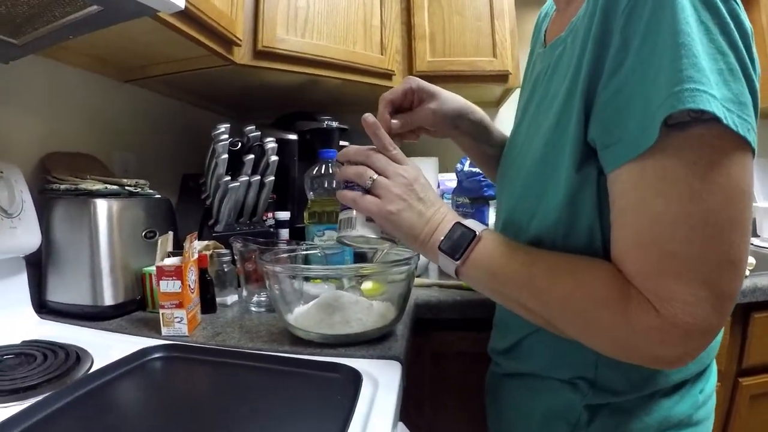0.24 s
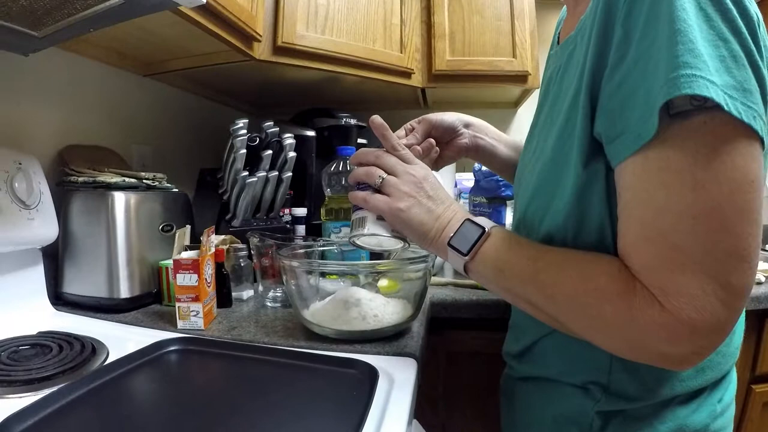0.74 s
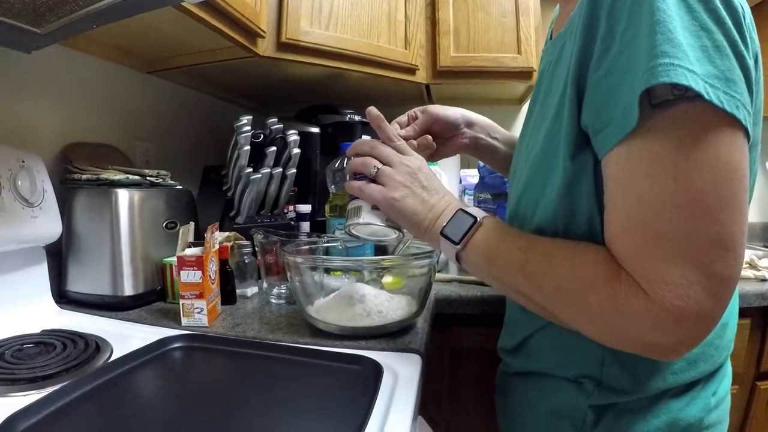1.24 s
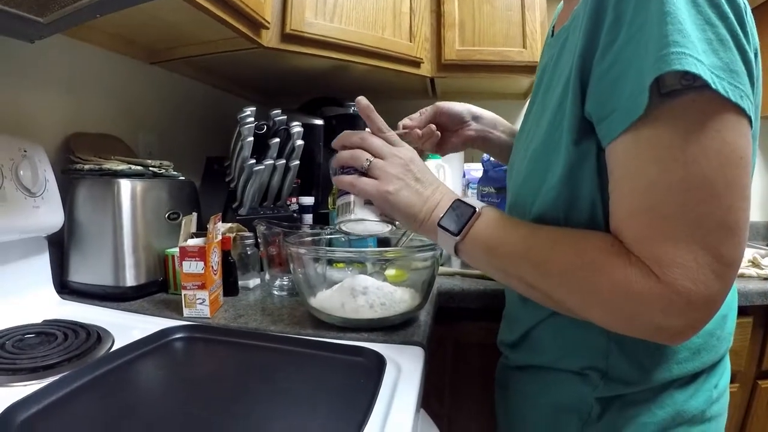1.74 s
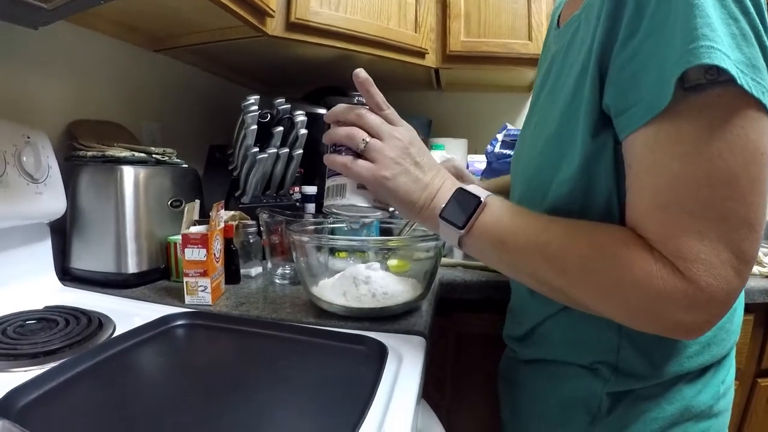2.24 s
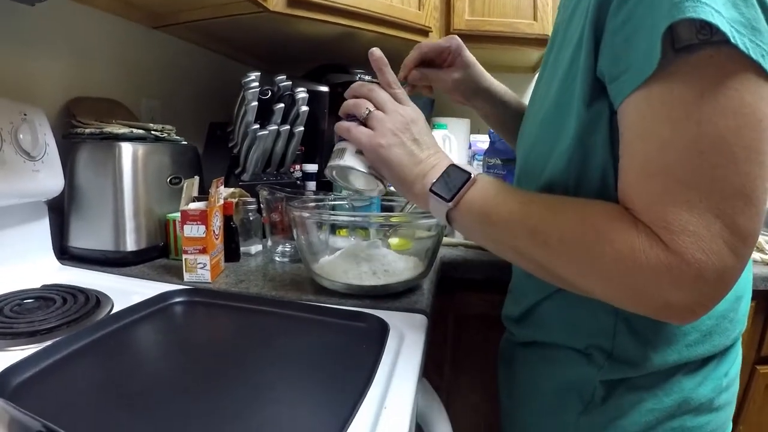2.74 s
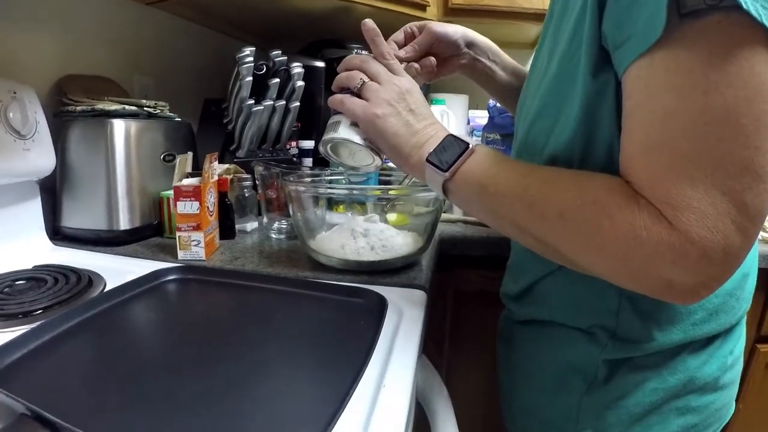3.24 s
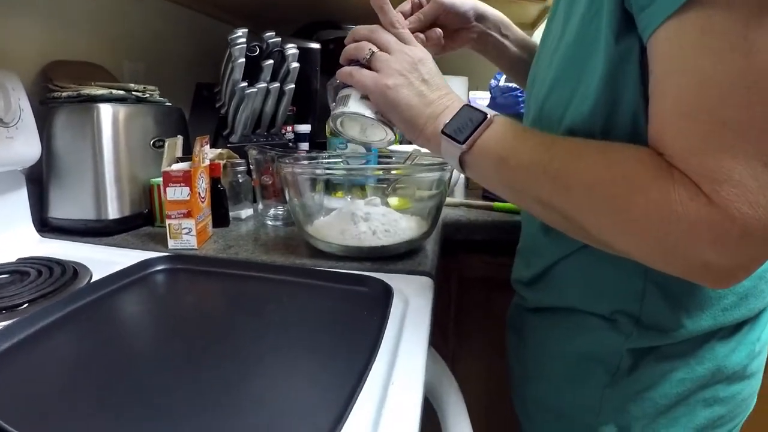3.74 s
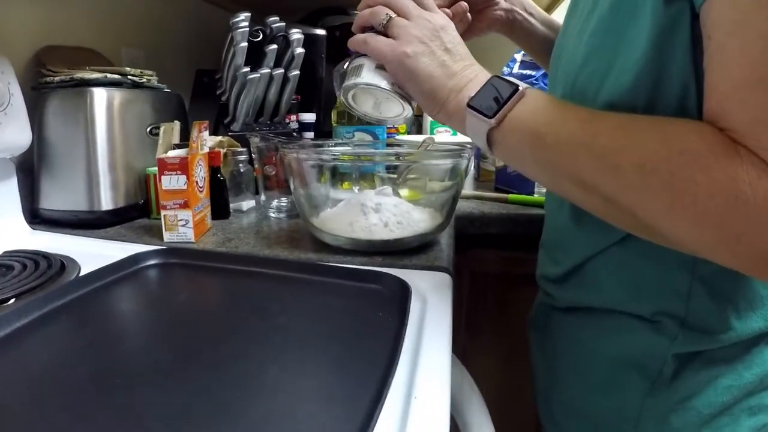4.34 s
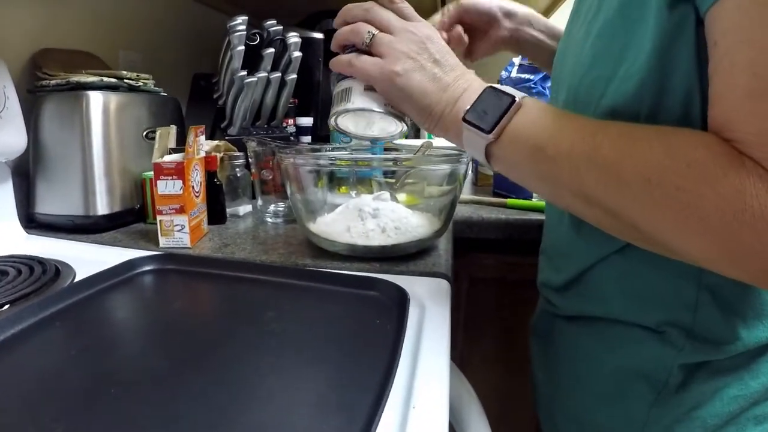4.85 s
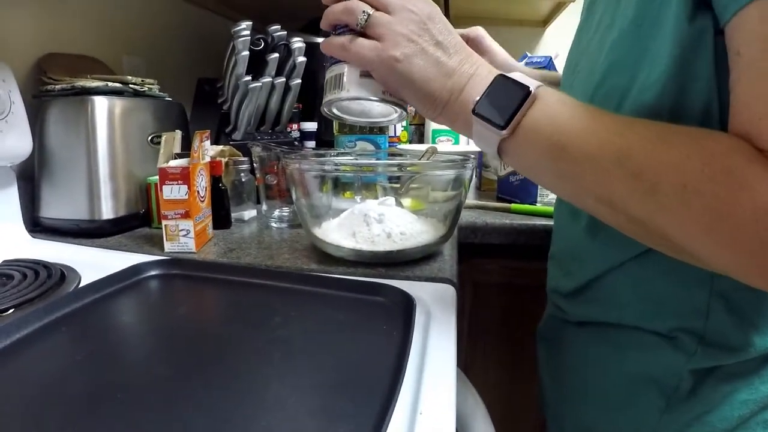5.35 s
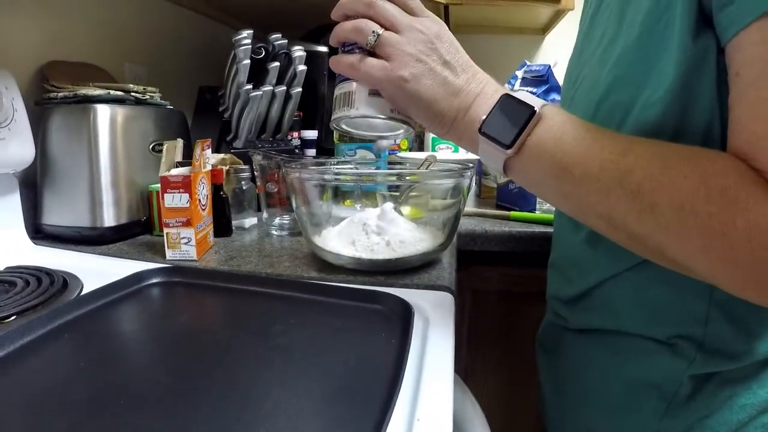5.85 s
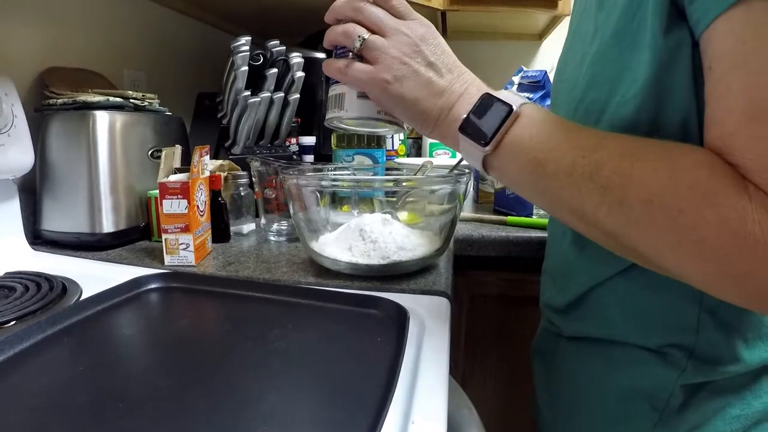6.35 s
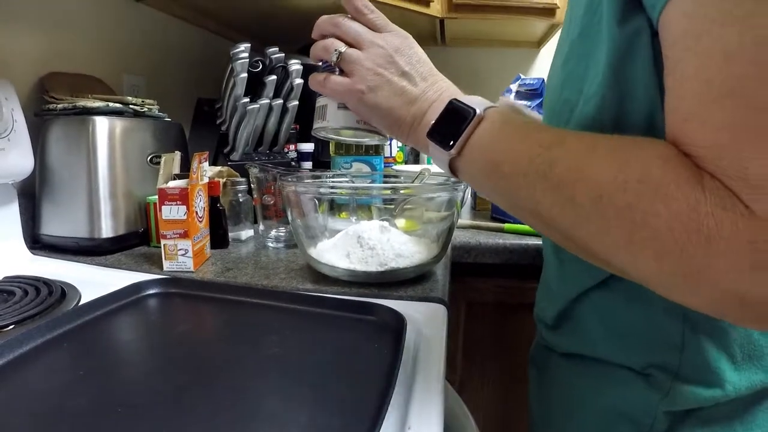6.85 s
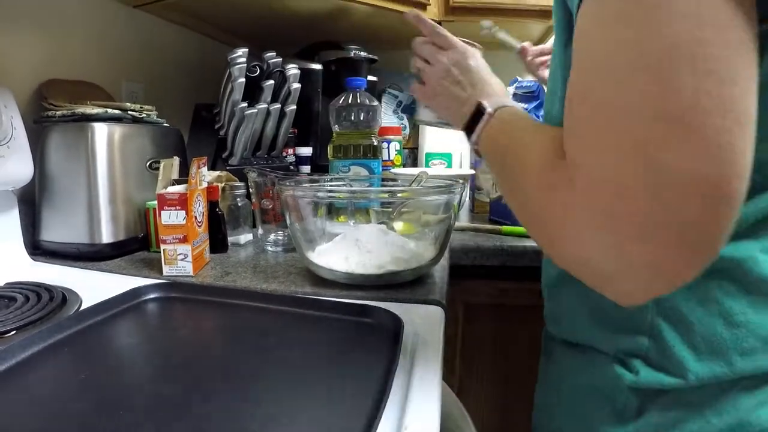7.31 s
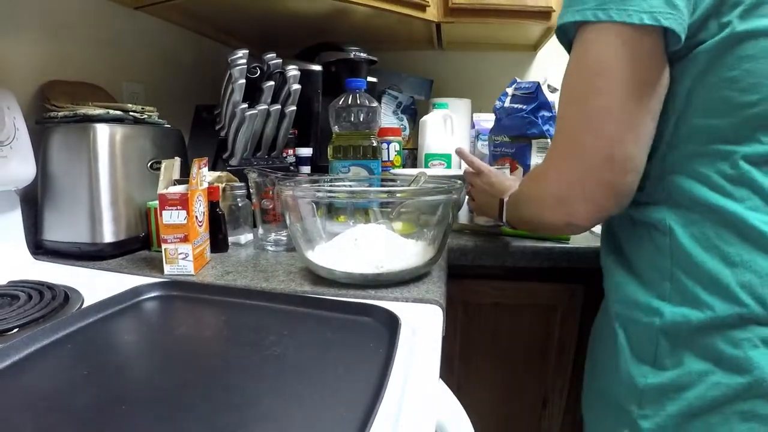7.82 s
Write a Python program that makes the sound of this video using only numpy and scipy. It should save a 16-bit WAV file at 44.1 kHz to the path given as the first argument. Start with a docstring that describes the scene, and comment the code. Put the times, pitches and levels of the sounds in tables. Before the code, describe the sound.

Close stereo pickup from a moving camera, with low rubbing and thuds leaning left. Under everything runs a motor hum with airy hiss and a faint whine that comes up midway. Sparse spoon clicks on a can come first, then two ringing strikes on a glass mixing bowl, and finally a quick woody rattle and short slide on the worktop, with short room reflections.

```python
"""Kitchen counter, heard in stereo from a moving camera. From the start an appliance hums, whines and blows air
(tones and coloured noise) while the camera body rumbles, rubs and bumps, mostly on the left (noise, short modes).
A steel spoon clicks and once scrapes on a small can's rim (noise bursts, damped modes), from 0.09 to 5 s.
At 6.6 and 7 s it taps a glass mixing bowl, which rings (decaying mode pairs), the second time with a low thump;
at 7.9 s a hard object knocks and slides on the worktop. The room answers; gain control and a limiter follow."""
import sys
import numpy as np
from scipy import signal
from scipy.fft import rfft, irfft, next_fast_len
from scipy.io import wavfile
from scipy.ndimage import uniform_filter1d, minimum_filter1d, map_coordinates

SR = 44100
rng = np.random.default_rng(int(sys.argv[2]) if len(sys.argv) > 2 else 0)


def store_wav(level_fs):
    """Save 16-bit WAV to argv[1]."""
    pcm = np.round(np.clip(np.atleast_2d(level_fs), -1, 1) * 32767)
    wavfile.write(sys.argv[1], SR, pcm.T.astype(np.int16))


N = 356239  # samples in the scene
SHORT, LONG = SR // 4, SR  # samples given to a short sound and to a bowl tap


def amp(db):
    """Decibels to gain."""
    return 10 ** (np.asarray(db) / 20)


def unit(x):
    """x at rms 1."""
    return x / np.sqrt(np.mean(x ** 2) + 1e-20)


def along(points, hz):
    """(Hz, value) points read on a log frequency axis."""
    f, v = np.transpose(points)
    return np.interp(np.log(hz + 1), np.log(f + 1), v)


def curves(rows):
    """One value per sample for each column after the time."""
    s, *cols = np.transpose(rows)
    return [np.interp(np.arange(N) / SR, s, c) for c in cols]


def wobble(rate):
    """A smooth random curve, rate knots a second."""
    frames = np.linspace(0, N * rate / SR, N // 100)
    knots = rng.standard_normal(int(frames[-1]) + 4)
    path = map_coordinates(knots, [frames])
    return np.interp(np.arange(N) * rate / SR, frames, path)


def filtered(x, response):
    """x times a response of frequency."""
    n = x.shape[-1]
    m = next_fast_len(n + SR // 4)
    hz = np.fft.rfftfreq(m, 1 / SR)
    return irfft(rfft(x, m) * response(hz), m)[..., :n]


def pan(left_db):
    """Gains of the two channels for a left-right level difference."""
    return amp(np.array([[left_db], [-left_db]]) / 2)


def noise(spectrum, alike, envelope):
    """Stereo noise with partly alike channels, shaped in time, then coloured by a causal filter."""
    def mid_and_side(hz):
        turn = np.arccos(np.clip(along(alike, hz), -1, 1)) / 2
        return np.array([np.cos(turn), np.sin(turn)])

    mid, side = filtered(rng.standard_normal((2, len(envelope))), mid_and_side)
    white = unit(np.array([mid + side, mid - side])) * envelope
    # the folded cepstrum gives the minimum-phase filter, so no sound precedes its cause
    size = 16384
    cepstrum = irfft(np.log(amp(along(spectrum, np.fft.rfftfreq(size, 1 / SR)))))
    folded = 2 * cepstrum[:size // 2] * (np.arange(size // 2) > 0)
    kernel = irfft(np.exp(rfft(folded, size)))
    kernel = kernel / np.linalg.norm(kernel)
    return signal.fftconvolve(white, kernel[None], axes=1)[:, :len(envelope)]


def fade(t60, size=SHORT):
    """Exponential decay, 60 dB in t60 seconds."""
    return np.exp(-np.log(1000) * np.arange(size) / SR / t60)


def ring(hz, t60, phase=0, size=SHORT):
    """A struck mode: a decaying sine."""
    return np.sin(2 * np.pi * hz * np.arange(size) / SR + phase) * fade(t60, size)


def add(track, s, sound):
    """Mix a sound into the track at s seconds."""
    part = track[:, round(s * SR):][:, :sound.shape[-1]]
    part += sound[..., :part.shape[1]]


def tone(hz, drift_hz):
    """A steady tone of rms 1 whose pitch drifts at random."""
    return np.sqrt(2) * np.sin(2 * np.pi * np.cumsum(hz + drift_hz * wobble(14)) / SR)


# Air level of the appliance. Each row: time in seconds, relative level in dB.
AIR_LEVEL = [(0.0, -54), (0.76, -56.5), (1.37, -53.5), (1.7, -56.5), (3.25, -55.5), (4.26, -60.5),
             (4.75, -59.5), (5.34, -61.5), (5.76, -57.5), (7.64, -56), (8.05, -56.5)]
# The whine comes up. Each row: time in seconds, relative level in dB.
WHINE_LEVEL = [(3.2, -68), (3.7, -62.5), (8, -59)]
# Motor hum tones. Each row: centre frequency in Hz, relative level in dB.
HUM_TONES = [(127.5, -44.5), (178, -58.5), (228, -57), (298, -58.5), (523, -60.5), (667, -64), (872, -66.5),
             (985, -65)]
# Colour of the air rush. Each row: frequency in Hz, relative level in dB per Hz.
RUSH_COLOUR = [(60, 4), (130, 6.5), (250, 4), (400, 0.5), (540, 1.5), (700, -0.5), (1000, -2.5), (1450, -5),
               (1700, -9), (2400, -11), (3300, -25.5), (6000, -46), (12000, -98)]
# Colour of the fine hiss. Each row: frequency in Hz, relative level in dB per Hz.
HISS_COLOUR = [(1500, -9.5), (3000, -0.5), (4500, -4), (5800, -0.5), (7300, -1.5), (8000, -10),
               (10000, -11.5), (12200, -20), (13000, -27), (14500, -70.5)]
# Stereo likeness of the air noise. Each row: frequency in Hz, left-right correlation from -1 to 1.
AIR_LIKENESS = [(100, 1), (470, 0.65), (950, -0.28), (3000, 0.2), (7000, -0.15)]


def appliance():
    """Motor hum, a thin wavering whine and a rush of air under fine hiss; rush and hiss follow one level."""
    hiss_db, rush_db, rush_waver_db = 4, 16, 0.78  # over the air level
    air_db, = curves(AIR_LEVEL)
    whine_db, = curves(WHINE_LEVEL)
    hum = sum(amp(db + 3.36 * wobble(3.7)) * tone(hz, drift_hz=2.983) for hz, db in HUM_TONES)
    whine = amp(whine_db + 1.5 * wobble(6.0)) * tone(1394, drift_hz=2.54)
    rush = noise(RUSH_COLOUR, AIR_LIKENESS, amp(air_db + rush_db + rush_waver_db * wobble(2.24)))
    hiss = noise(HISS_COLOUR, AIR_LIKENESS, amp(air_db + hiss_db))
    return hum * pan(-7.0) + whine * pan(-19.5) + rush * pan(-3.0) + hiss * pan(-2.2)


def around(s, width_s):
    """A smooth hump of height 1 centred on s seconds."""
    return np.exp(-((np.arange(N) / SR - s) / width_s) ** 2)


# Colour of the low rumble in the camera body. Each row: frequency in Hz, relative level in dB per Hz.
RUMBLE_COLOUR = [(4, -4.5), (15, 7.5), (40, 2.5), (52, -5.5), (70, -8.5), (100, -29.5), (200, -67),
                 (600, -120)]
# Colour of rubbing on the camera body. Each row: frequency in Hz, relative level in dB per Hz.
RUB_COLOUR = [(40, -12), (75, 6), (100, -3), (150, -12), (230, -18), (320, -27), (420, -36), (900, -67.5),
              (3000, -120)]
# Soft low bumps on the camera body; the one at 6.964 s is the low thump of the second bowl tap.
# Each row: start in seconds, relative level in dB, main pitch in Hz.
LOW_BUMPS = [(0.202, -5, 172), (1.346, -4, 174), (1.438, -8, 180), (1.8732, -6, 194), (2.319, -2.5, 186),
             (2.546, -9, 226), (2.619, -7.5, 195), (2.832, -7.5, 172), (3.07, -3.5, 188),
             (3.253, -9.5, 182), (3.586, -3.5, 203), (3.838, -7, 185), (4.0854, -1, 201),
             (4.1602, -12, 208), (4.298, -6.5, 181), (4.903, -5.5, 220), (4.968, -7, 174),
             (6.964, -3.5, 190)]


def handling():
    """The camera body rumbles, pushing its two microphone ports in opposite senses, rubs and takes soft bumps;
    the low thump of the second bowl tap is made the same way."""
    rub_level_db, rub_waver_db = -35.5, 1.5
    stir_db, stir_s = 3, 0.36  # the rubbing grows around each low bump: rise, half-width of the hump
    rest_s, rest_width_s, rest_db = 5.17, 0.22, -5  # the camera is nearly still for a moment

    deep = noise(RUMBLE_COLOUR, [(60, -0.63)], np.ones(N))
    power = uniform_filter1d(deep[0] ** 2, size=SR // 25)
    deep /= np.sqrt(.4 + .6 * power)  # an even rumble without tall peaks

    stir = np.max([around(s, stir_s) for s, db, hz in LOW_BUMPS], axis=0)
    rub_db = rub_level_db + stir_db * stir + rest_db * around(rest_s, rest_width_s)
    rub_db = rub_db + rub_waver_db * wobble(8)
    rub = noise(RUB_COLOUR, [(80, -0.73), (200, 0.68)], amp(rub_db))

    out = amp(-18.5) * deep + rub
    soft_start = (1 - fade(0.038)) ** 2
    for s, db, hz in LOW_BUMPS:
        push = ring(hz, 0.028) + amp(-0.5) * ring(hz * 0.4, 0.061) + amp(-5.5) * ring(hz * 1.675, 0.02)
        add(out, s, amp(db) * push * soft_start)
    return out * pan(14.0)


def favour(hz, centre_hz, octaves):
    """How well a contact point drives a mode, 0 to 1."""
    return np.exp(-(np.log2(hz / centre_hz) / octaves) ** 2)


# Spoon against the can. Each row: start in seconds, relative levels in dB of click, can body and spoon ring,
# Hz that the contact point favours, Hz above which the click is dull.
CAN_CLICKS = [(.089, -48, -45, -40, 3000, 7000), (.1288, -30.5, -55, -30, 3000, 7000),
              (.1355, -33, -52, -29.5, 2400, 7000), (1.6551, -45, -35, -38, 4200, 8000),
              (1.678, -42, -46, -37, 4300, 12000), (1.686, -48, -60, -38, 5200, 9000),
              (2.7795, -24, -35, -26, 4200, 11000), (2.781, -27.5, -50, -30, 6400, 11000),
              (2.787, -31, -48, -33, 7300, 13000), (2.798, -31, -55, -35, 6300, 11000),
              (2.805, -36, -58, -39, 4800, 9000), (2.846, -27, -24.5, -36, 6500, 7500),
              (2.852, -30, -35, -34, 2500, 8000), (2.9, -52, -38, -54, 6000, 7000),
              (2.92, -41, -50, -54, 6000, 8000), (2.936, -22.5, -44, -27, 4700, 13000),
              (2.943, -36, -37, -42, 5000, 12000), (4.529, -41, -50, -52, 4000, 5000),
              (4.975, -48, -60, -58, 6000, 12000)]
# Colour of the click. Each row: frequency in Hz, relative level in dB per Hz.
CLICK_SPECTRUM = [(300, -6), (1000, 3), (2300, 0.5), (3000, -0.5), (3500, -2.5), (4200, 1.5), (5100, 3.5),
                  (5600, -1.5), (6200, 1.5), (6900, 3), (8200, -7.5), (10500, -9), (12000, -22),
                  (13600, -23), (15500, -50)]
# The can's hollow ring. Each row: frequency in Hz, relative level in dB, t60 in seconds.
CAN_MODES = [(807, -11, .14), (1005, 1, .07), (1105, 1.5, .05), (1189, 2, .115), (1225, -4, .1),
             (1416, -3, .051), (1800, -8, .075), (2125, -13, .07), (2620, -14, .07)]
# The spoon's ring, damped by the hand. Each row: frequency in Hz, relative level in dB, t60 in seconds.
SPOON_MODES = [(2290, -2, .04), (2560, -12, .03), (3000, -7, .08), (4180, -2, .03), (4495, -5, .045),
               (5110, -6, .035), (5330, -5.5, .07), (5890, -4, .03), (6340, -2, .045), (6880, -2.5, .045),
               (7440, -8, .06), (10420, -3, .04)]


def can():
    """The spoon clicks on the rim and pings; the gripped can answers with a short, hollow ring."""
    out = np.zeros((2, N))
    click_shape = amp(-3.5) * fade(0.053) + amp(-15) * fade(0.0037)
    onset = 1 - fade(0.00085)
    for s, click_db, body_db, ping_db, contact_hz, dull_hz in CAN_CLICKS:
        click = noise(CLICK_SPECTRUM, [(1000, 0.52), (5000, 0.29)], click_shape)
        # softer contacts lack the top
        click = filtered(click, lambda hz: 1 / np.sqrt(1 + (hz / dull_hz) ** 8))
        body = sum(amp(level) * ring(hz, t60) for hz, level, t60 in CAN_MODES)
        ping = 0
        for hz, level, t60 in SPOON_MODES:
            missed_db = 46 * (1 - favour(hz, contact_hz, octaves=0.78))  # far modes are barely driven
            ping = ping + amp(level - missed_db) * ring(hz, t60, rng.uniform(0, np.pi, (2, 1)))
        rings = (amp(body_db - 5) * body + amp(ping_db) * ping) * onset
        add(out, s, amp(click_db) * click * pan(1.9) + rings)
    return out


# Colour of the squeak on the rim. Each row: frequency in Hz, relative level in dB per Hz.
SCRAPE_SPECTRUM = [(1000, -11), (3100, -26), (4400, -5), (4900, -16), (5330, -5), (5600, -6), (5890, 5),
                   (6200, -8), (7000, -9), (8200, -21.5), (12000, -34), (15000, -58)]


def scrape():
    """The spoon's edge drags over the rim, pressing harder as it goes, with a brief, gritty squeak."""
    start_s, length_s, final_db = 1.654, 0.026, -32.5
    grows_db, grain_db = 10, 0.5
    t = np.arange(SHORT) / SR
    grain = unit(uniform_filter1d(rng.standard_normal(SHORT), size=60))
    press_db = grows_db * (np.minimum(t / length_s, 1) - 1) + grain_db * grain
    release = np.interp(t - length_s, t, fade(0.015))  # holds at 1 until the drag ends
    squeak = noise(SCRAPE_SPECTRUM, [(1000, 0.54), (5000, 0.29)], amp(final_db + press_db) * release)
    out = np.zeros((2, N))
    add(out, start_s, squeak)
    return out


def shimmer(hz):
    """High modes flutter in level as they die; low ones stay smooth."""
    knots = rng.standard_normal(60)
    depth_db = np.interp(hz, [1500, 2400, 6000], [0, 2.2, 3.5])
    path = np.interp(np.linspace(0, len(knots) - 1, LONG), np.arange(len(knots)), knots)
    return amp(depth_db * path)


# Spoon on the bowl. Each row: start in seconds, relative levels in dB of glass, spoon clash and its after-ring.
BOWL_TAPS = [(6.6107, -11.5, -19, -30.5), (6.9525, -5, -10, -27)]
# The glass bowl's modes, many in beating pairs. Each row: frequency in Hz, relative level in dB, t60 in seconds,
# left-right level in dB, left phase lead in radians, level change in dB at the second tap's spot.
BOWL_MODES = [(598, -2, .29, -4.5, .1, -1.5), (610, -7.5, .27, -4.5, .1, -1),
              (1338.4, -6.8, .89, -2.5, .5, 0), (1339.6, -7.3, .89, -2.5, .5, 0),
              (2347, -12, .21, 2, 1, -8), (2350, -28, .65, 2, 1, -4), (3615, -21.5, .27, 3, .3, -2),
              (3620.5, -23, .27, 3, .3, -3), (3973, -28, .06, 2, .5, 2), (5136, -16.5, .11, 0, 1.4, -8),
              (5160, -21.5, .55, 1, 1.8, -7), (5171, -30, .25, 1, 1.8, -1), (5420, -19, .06, 0, 1.4, -4),
              (5819, -27, .2, 0, 1.4, -7), (6132, -23, .14, 0, 1.4, -7), (6352, -17.5, .08, 0, 1.4, -4),
              (6654, -24, .15, 1, 1.4, -5), (6865, -25, .26, 1, 1.4, -1), (6921, -19.5, .28, 1, 1.4, -1),
              (6992, -27, .24, 1, 1.4, -3), (7545, -28, .22, 4, 2.4, -4), (7596, -24, .22, 5, 2.4, -4),
              (7779, -26, .27, 7, 2.2, 0), (7802, -27, .1, 5, 2.2, 10), (8098, -33, .26, 8, 1.9, 2),
              (8463, -37, .3, 2, 1, -1), (8930, -36, .28, 2, 1, -1), (9500, -37, .18, 2, 1, -3),
              (9668, -31, .22, 4, -2.2, -3), (9935, -36, .23, 2, 1, 2), (10560, -41, .2, 2, 1, -3),
              (11340, -42, .2, 0, 1, 0), (12668, -43, .2, 0, 1, 0), (13410, -40, .1, 0, 0, 0)]
# The spoon's dense, short clash. Each row: frequency in Hz, relative level in dB per Hz.
CLASH_COLOUR = [(200, -14), (700, 16), (1500, -15.5), (2400, -15.5), (3100, -37), (3800, 6.5), (4450, -19),
                (5300, 2.5), (6800, 10), (8300, -8), (9800, -12), (11000, -29), (13400, -20), (14500, -55)]
# The thud of the contact. Each row: frequency in Hz, relative level in dB per Hz.
THUD_COLOUR = [(150, 10), (500, -11.5), (1000, -7.5), (1700, -10), (2350, -2), (3000, -19), (3900, -24),
               (4500, -24), (9000, -52)]


def bowl():
    """Each tap thuds and rings the glass in a mix set by where it lands; the held spoon clashes briefly."""
    out = np.zeros((2, N))
    swell = 1 - fade(0.014, LONG)  # the wall takes a moment to get moving
    for moved, (s, db, clash_db, after_db) in enumerate(BOWL_TAPS):
        glass = 0
        for hz, level, t60, left_db, lead, change_db in BOWL_MODES:
            phases = np.array([[lead], [-lead]]) / 2
            mode = ring(hz, t60, phases, LONG) * shimmer(hz)
            glass = glass + amp(level + moved * change_db) * pan(left_db) * mode
        clash_shape = amp(clash_db) * fade(0.05) + amp(after_db) * fade(0.18)
        clash = noise(CLASH_COLOUR, [(1000, 0.32), (6000, 0.34)], clash_shape) * pan(1.5)
        thud = noise(THUD_COLOUR, [(500, 1.0), (3000, 0.49)], amp(clash_db - 3.5) * fade(0.075))
        add(out, s, amp(db) * glass * swell)
        add(out, s, clash + thud)
    return out


# A hard object lands and rocks briefly. Each row: start in seconds, relative level in dB.
COUNTER_KNOCKS = [(7.8813, -15.5), (7.8836, -12.5), (7.8894, -16.5), (7.9046, -14), (7.9095, -23),
                  (7.921, -28)]
# Colour of the dull blow. Each row: frequency in Hz, relative level in dB per Hz.
KNOCK_SPECTRUM = [(100, 6), (300, -4), (450, -9), (750, -9), (1050, -5.5), (1330, 2.5), (1500, -6),
                  (1750, -5.5), (2300, -15.5), (2900, -25), (3700, -21), (4900, -35), (5600, -24.5),
                  (7200, -31), (8100, -52), (11000, -53), (15000, -79)]
# Hollow ring of the knock. Each row: frequency in Hz, relative level in dB, t60 in seconds.
COUNTER_MODES = [(100, -4.5, 0.13), (302, -17, .13), (1220, -8, .06), (1330, 2.5, 0.034), (1450, -2, 0.028),
                 (1667, -4.5, .05), (1920, -16, 0.056)]
# Colour of the slide. Each row: frequency in Hz, relative level in dB per Hz.
SLIDE_SPECTRUM = [(300, -7), (800, -13), (1200, 0), (1600, -3), (2100, -7), (2600, -11), (3200, -20),
                  (7000, -28), (12000, -53)]


def counter():
    """Dull, woody knocks on the worktop, each with a short hollow ring; the object grates as it slides to rest."""
    knock_t60_s, tail_db, tail_t60_s = 0.019, -15.5, 0.14  # each blow, and the worktop's after-ring
    hollow_db = -8.5  # the ring against the dull blow
    slide_s, slide_db, slide_t60_s, roughness_db = 7.893, -35, 0.22, 4.5

    out = np.zeros((2, N))
    shape = (fade(knock_t60_s) + amp(tail_db) * fade(tail_t60_s)) * (1 - fade(0.0029))
    for s, db in COUNTER_KNOCKS:
        blow = noise(KNOCK_SPECTRUM, [(1500, 0.31), (5000, 0.43)], shape)
        hollow = sum(amp(level) * ring(hz, t60, rng.uniform(0, 2 * np.pi))
                     for hz, level, t60 in COUNTER_MODES) * (1 - fade(0.0024))
        add(out, s, amp(db) * (blow + amp(hollow_db) * hollow))

    grit = unit(uniform_filter1d(rng.standard_normal(SHORT), size=60))
    slide_shape = amp(slide_db + roughness_db * grit) * fade(slide_t60_s)
    add(out, slide_s, noise(SLIDE_SPECTRUM, [(1500, 0.37)], slide_shape))
    return out * pan(-1.3)


# Decay of the room. Each row: frequency in Hz, t60 in seconds.
KITCHEN_DECAY = [(200, 0.48), (1500, 0.28), (6000, 0.24), (13000, 0.23)]


def kitchen(x):
    """Cupboards and walls answer as a decaying noise tail; the treble dies first."""
    hz, t, z = signal.stft(rng.standard_normal((2, SR // 2)), SR, nperseg=256)
    decay = amp(-60 * t / along(KITCHEN_DECAY, hz)[:, None])
    tail = signal.istft(z * decay, SR, nperseg=256)[1]
    tail = np.pad(tail / np.linalg.norm(tail[0]), ((0, 0), (SR // 300, 0)))  # the answer comes 1/300 s late
    return signal.fftconvolve(x, tail, axes=1)[:, :N]


# Share of the bowl's ring that fills the room. Each row: frequency in Hz, level in dB.
BOWL_TO_ROOM = [(600, -17), (1400, -22), (2400, -9), (3600, -14), (5200, -9), (7000, -9)]


def scene():
    """Spoon work at the counter, in the room, over the appliance and the low handling sounds."""
    background = appliance() + handling()
    small = can() + scrape()
    glass = bowl()
    small = small + counter()
    spread = filtered(glass, lambda hz: amp(along(BOWL_TO_ROOM, hz)))
    return glass + small + kitchen(spread + amp(-6.0) * small) + background


def record(dry):
    """Gain control ducks under loud sound above 400 Hz, a limiter rounds off tall peaks; then the band limit."""
    threshold_db, recover_s, ceiling, top_hz = -14.5, .15, .9, 15700
    power = np.mean(filtered(dry, lambda hz: hz > 400) ** 2, axis=0)
    level = np.sqrt(np.abs(uniform_filter1d(power, size=SR // 100)))
    needed = np.minimum(1, amp(threshold_db) / (level + 1e-9))
    recover = np.exp(-1 / (recover_s * SR))
    slow = 1 - signal.lfilter([1 - recover], [1, -recover], 1 - needed)
    ducked = dry * np.minimum(needed, slow)  # ducks at once, recovers slowly

    headroom = np.minimum(1, ceiling / (np.abs(ducked) + 1e-9))
    lowest = minimum_filter1d(headroom, size=SR // 100)
    limited = ducked * uniform_filter1d(lowest, size=SR // 100)
    return filtered(limited, lambda hz: hz < top_hz)


dry = scene()
out = record(dry)
store_wav(out)
```